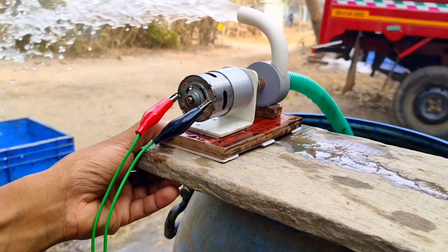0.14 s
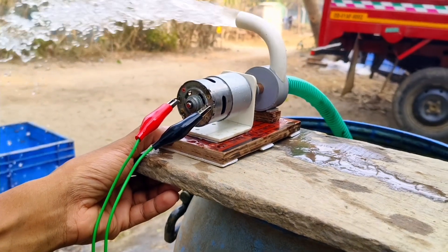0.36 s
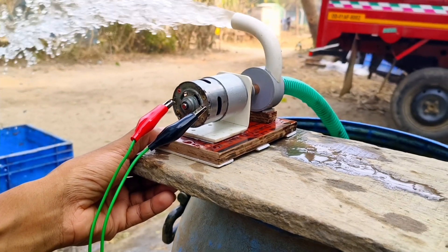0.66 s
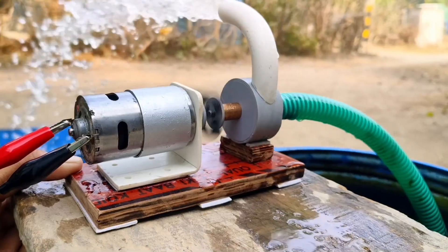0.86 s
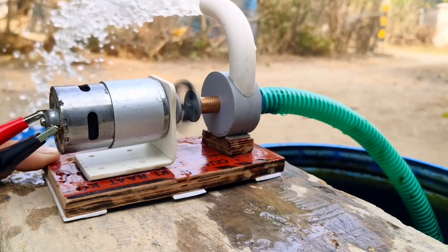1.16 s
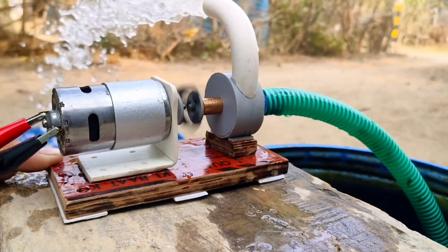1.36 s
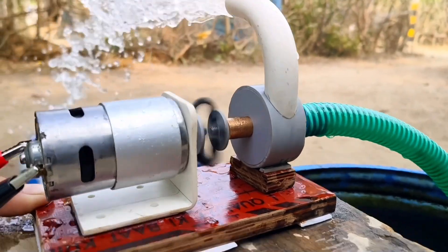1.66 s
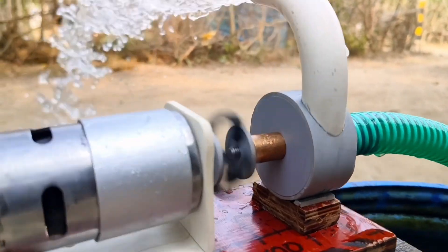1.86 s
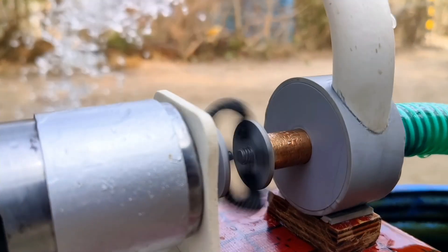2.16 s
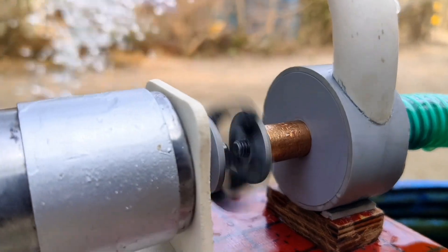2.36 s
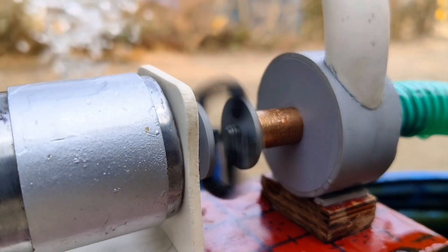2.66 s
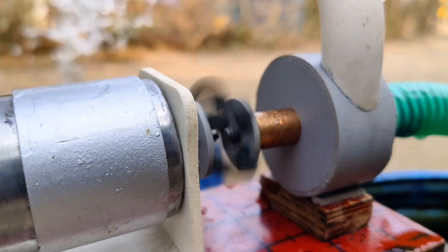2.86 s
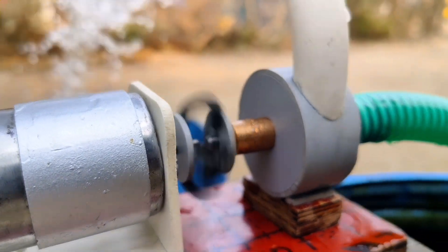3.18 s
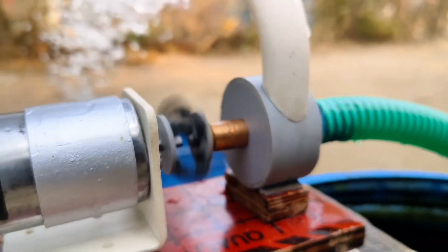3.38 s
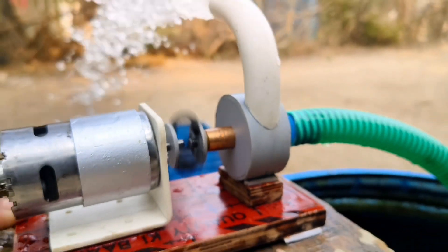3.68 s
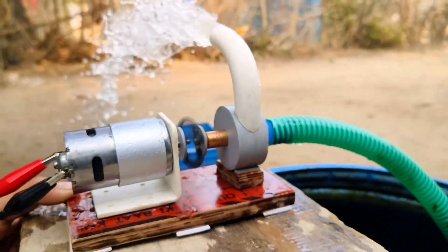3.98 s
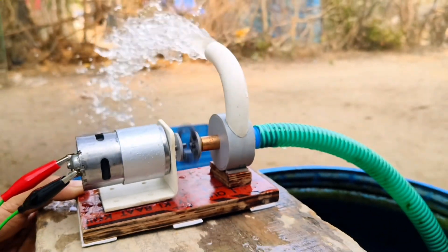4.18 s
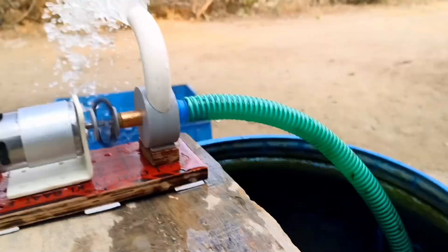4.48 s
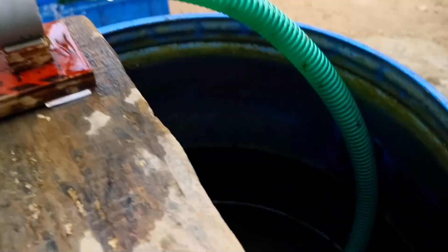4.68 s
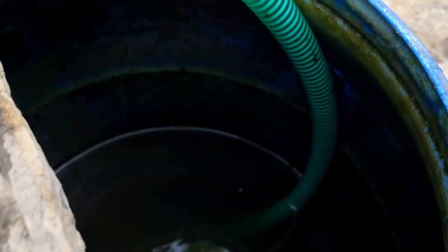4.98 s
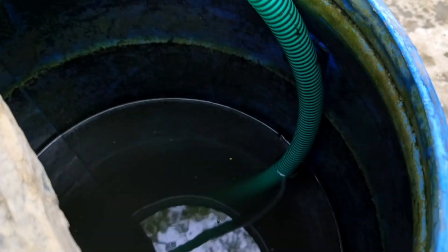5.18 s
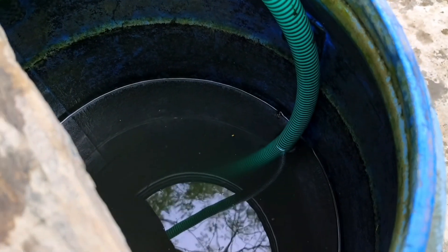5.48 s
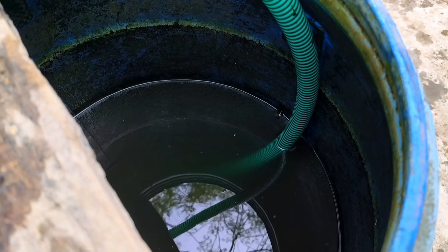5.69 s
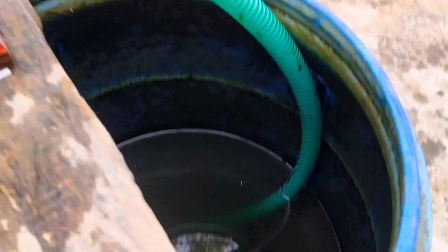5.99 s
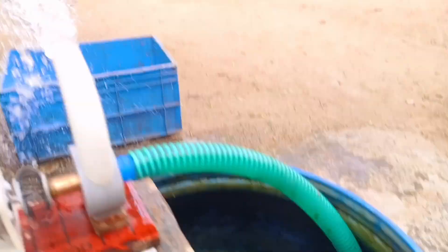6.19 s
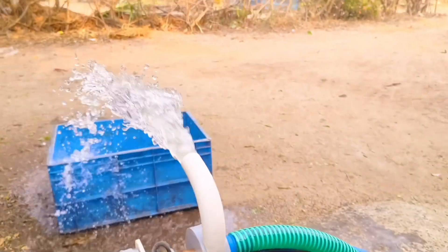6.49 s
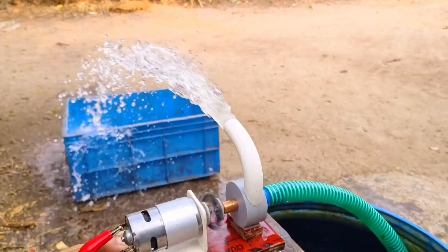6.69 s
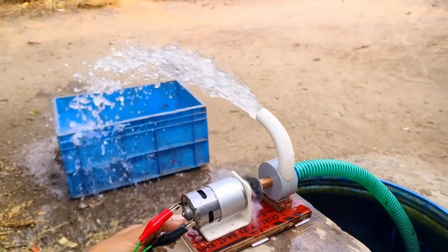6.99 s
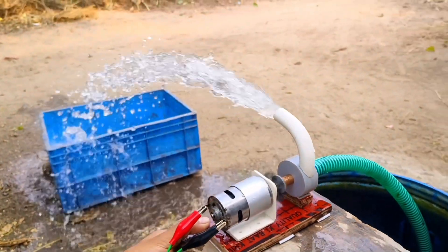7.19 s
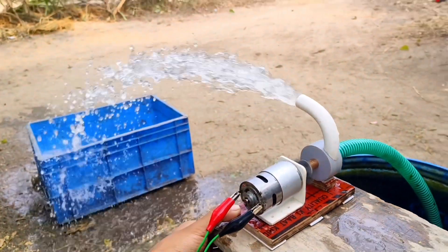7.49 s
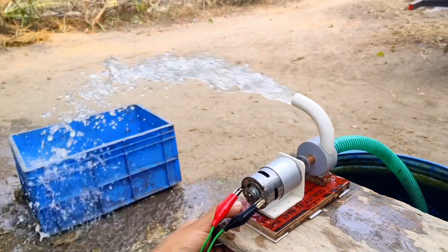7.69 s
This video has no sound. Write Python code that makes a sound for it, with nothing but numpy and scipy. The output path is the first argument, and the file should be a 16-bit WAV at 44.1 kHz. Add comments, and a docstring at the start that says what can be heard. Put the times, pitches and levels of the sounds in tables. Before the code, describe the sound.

Steady low motor drone with gushing, clumpy water splatter and sharp close drips, cutting to silence briefly before one second

```python
"""Pump on a barrel

A small electric pump on a slab over a plastic barrel throws a jet of water onto a crate and wet ground.
The shaft hums as sines at whole orders, noise rings the barrel and board, and short rings make the drops.
A pair of ports moves around the motor, so level and left-right balance drift.
The sound fades to near silence before one second and soon returns."""
import sys
import numpy as np
from scipy import signal
from scipy.io import wavfile
from scipy.ndimage import uniform_filter1d

SR = 44100
rng = np.random.default_rng(int(sys.argv[2]) if len(sys.argv) > 2 else 0)


def dump_mix(stems):
    """Bounce the given channels to the path in sys.argv[1] as a 16-bit WAV at rate SR."""
    frames = np.atleast_2d(stems).T  # one column per channel
    limited = np.clip(frames, -1, 1)  # hard clip at full scale
    pcm = np.round(limited * 32767).astype(np.int16)
    wavfile.write(sys.argv[1], SR, pcm)


N = 346185


def amp(db):
    """Decibels to gain."""
    return 10 ** (np.asarray(db) / 20)


def evened(x):
    """Scales to an rms of one."""
    return x / np.sqrt(np.mean(x ** 2) + 1e-20)


def read(points, hz):
    """Reads a table on a log-frequency axis."""
    f, value = np.transpose(points)
    return np.interp(np.log(hz + 1), np.log(f + 1), value)


def columns(rows):
    """Draws each column after the time as a curve, sample by sample."""
    s, *rest = np.transpose(rows)
    return [np.interp(np.arange(N) / SR, s, c) for c in rest]


def sides(db):
    """Left and right gains for a left-right difference at constant power."""
    pair = amp(np.array([db, -db]) / 2)
    return pair / np.sqrt(np.mean(pair ** 2, axis=0))


def wander(hz):
    """Slow random drift of rms one: noise low-passed at hz."""
    lowpass = signal.butter(2, hz, fs=SR, output="sos")
    return evened(signal.sosfilt(lowpass, rng.standard_normal(N)))


def bandpass(lo_hz, hi_hz):
    """Second-order band-pass filter sections."""
    return signal.butter(2, [lo_hz, hi_hz], "band", fs=SR, output="sos")


# Head start of the left port, before stretching. Each row: frequency in Hz, lead in radians.
PORT_LEAD = [(0, 0), (350, 0), (860, 1.6), (1040, 2.3), (1380, 3.05), (1700, 3.4), (2000, 4.4), (2200, 6),
             (2900, 9.4), (4200, 10.2), (5500, 12.6), (7000, 15.7), (8900, 22), (16200, 35)]
# Likeness of the two ports. Each row: frequency in Hz, share heard alike (0 to 1).
PORT_LIKENESS = [(60, .9), (140, .97), (300, .8), (600, .3), (1250, .84), (1550, .9), (1750, .62),
                 (2100, .15), (2900, .5), (6500, .4), (8000, .2), (15000, .12)]
# Colour of the right port. Each row: frequency in Hz, gain in dB.
RIGHT_COLOUR = [(300, -2.5), (800, 0), (1200, -1.5), (1550, -1), (2500, 3), (4000, -4.5), (5000, 1.5),
                (6500, 0.5), (9000, -1), (15000, 0)]
# Motor and barrel rim shade the water as the ports move; the stretches also serve the unshaded sources.
# Each row: time in seconds, gain of the low splash in dB, gain of the top in dB, left-right difference
# in dB, stretch of the path difference (a factor) in the low and in the high splash.
PORT_SHADE = [(0, 2, -4.5, -0.5, 1.26, 0.77), (.6, 6.1, -0.5, -0.54, 1.52, 1.09),
              (1.4, 7.5, -2.5, 1, 0.71, 1.07), (2.3, 4.3, -4, 0.66, 0.79, 1.02),
              (3.2, 2.2, -3, 0.34, 0.79, 1.005), (4.5, 9.1, -1, -0.42, 0.89, 1),
              (5, 3.5, -4, 0.66, 1.03, 1.32), (6, 3.6, -6, 0.51, 1.06, 1.31),
              (6.5, 10.7, -0.5, -0.42, 1.06, 0.97), (7.2, 3.7, -3.5, -0.29, 0.67, 1.05),
              (7.85, 1.7, -6, -0.42, 0.71, 1.07)]


def ports(direct, scattered, colour, shaded=False, patchy_db=0):
    """Colours a source; the right port hears it late and mixed with its scattered share."""
    hz, s, (left, other) = signal.stft([direct, scattered], SR, nperseg=1024)
    at, *curves = np.transpose(PORT_SHADE)
    low_db, top_db, pan, low_stretch, high_stretch = (np.interp(s, at, c) for c in curves)
    low = 1 / (1 + (hz / 1800) ** 6)
    top = 1 / (1 + (6000 / (hz + 1)) ** 6)
    same = np.clip(read(PORT_LIKENESS, hz), 0, 1)[:, None]
    lead = np.interp(hz, *np.transpose(PORT_LEAD))[:, None]
    stretch = np.outer(low, low_stretch) + np.outer(1 - low, high_stretch)
    late = np.exp(-1j * lead * stretch)
    right = same * late * left + np.sqrt(1 - same ** 2) * other
    right = right * amp(read(RIGHT_COLOUR, hz))[:, None]
    # the landing place wanders, so patches of pitch swell and sink
    patches = uniform_filter1d(rng.standard_normal(left.shape), size=16, axis=0)
    patches = evened(uniform_filter1d(patches, size=4, axis=1))
    shade_db = shaded * (np.outer(low, low_db) + np.outer(top, top_db))
    gain = amp(read(colour, hz)[:, None] + shade_db + patchy_db * patches)
    pair = np.array([left, right]) * gain * sides(shaded * pan)[:, None]
    return evened(signal.istft(pair, nperseg=1024)[1][:, :N])


STILL_AIR_DB = -60
# Swells of air on the ports. Each row: centre in seconds, level in dB, half length in seconds.
AIR_GUSTS = [(3.95, -54, .05), (4.414, -48, 0.1), (4.982, -39, 0.049), (5.55, -52, 0.11), (6.3, -51, .08),
             (7, -64, 0.092)]


def moving_air():
    """Air moving over the ports: deep band-passed noise in bell-shaped gusts."""
    now = np.arange(N) / SR
    swells = sum(amp(db) * np.exp(-((now - s) / half) ** 2) for s, db, half in AIR_GUSTS)
    air = signal.sosfilt(bandpass(40, 64), rng.standard_normal((2, N)))
    air = air + 1.2 * air[::-1]  # each port also hears the other's air
    return (amp(STILL_AIR_DB) + swells) * sides(7.)[:, None] * evened(air)


# Faint thin tones. Each row: start in seconds, length in seconds, first pitch in Hz, last pitch in Hz,
# level in dB.
THIN_TONES = [(6.72, .09, 1710, 1690, -46), (6.86, .08, 1690, 1690, -47.5), (7.29, .11, 1570, 1520, -44.5)]


def whistles():
    """A few faint sine tones, steady or slightly falling, softly in and out."""
    out = np.zeros(N)
    for s, length, from_hz, to_hz, db in THIN_TONES:
        u = np.arange(0, 1, 1 / (length * SR))
        phase = 2 * np.pi * np.cumsum(from_hz + (to_hz - from_hz) * u) / SR
        out[round(s * SR):][:len(u)] += amp(db) * 2 * np.sin(np.pi * u) * np.sin(phase)
    return out


# the slab follows a share of the 4th shaft order's swing about its middle level
RUMBLE_DB, RUMBLE_SHARE, MID_4TH_DB = -37, 0.49, -30


def slab_db():
    """Level of the slab rumble, from the nearness of the motor."""
    return RUMBLE_DB + RUMBLE_SHARE * (columns(SHAFT_ORDERS)[0] - MID_4TH_DB)


# Two noisy rings, the lower one from the mounting board and an upper one near 940 Hz. Each row: pitch in Hz,
# width in Hz, level in dB before the motor's nearness.
NOISY_RINGS = [(411, 48, -49), (943, 59, -47.5)]


def noisy_rings():
    """Resonances shaken by noise, the board's and one near 940 Hz, ringing in short uneven swells."""
    out, t = np.zeros((2, N)), np.arange(SR // 10) / SR
    for hz, width, db in NOISY_RINGS:
        shake = rng.standard_normal((2, N)) * amp(3 * wander(8))
        ring = t * np.exp(-np.pi * width * t) * np.sin(2 * np.pi * hz * t)
        out += amp(db) * evened(signal.oaconvolve(shake, ring[None], axes=1)[:, :N])
    return out * amp(slab_db() - RUMBLE_DB)


# Colour of the slab rumble. Each row: frequency in Hz, relative density in dB per Hz.
RUMBLE_COLOUR = [(40, -36.5), (65, -1), (100, -13.5), (200, 4), (420, -9.5), (700, -8.5), (900, -11.5),
                 (1300, -24), (3000, -63)]


def slab_rumble(knock):
    """The slab rumbles: coloured noise, pulsed once and twice a turn by the shaft load."""
    return amp(slab_db()) * ports(*rng.standard_normal((2, N)) * knock, RUMBLE_COLOUR)


# Drum modes of the barrel wall. Each row: pitch in Hz, nominal width in Hz (damped 1.5 times as fast),
# relative level in dB.
BARREL_MODES = [(148, 4.5, 11), (155, 5, 3)]
# Level of the boom noise over time. Each row: time in seconds, level in dB.
BOOM_LEVEL = [(0, -48.5), (.62, -51), (1.2, -35), (2.02, -37), (2.08, -29), (2.73, -27.5), (2.81, -39),
              (3.1, -25), (3.17, -48), (3.32, -18), (3.4, -35), (3.87, -27), (4.44, -40), (4.53, -29),
              (4.65, -39), (4.75, -25), (4.91, -19), (5.01, -30), (5.06, -28), (5.19, -29), (5.25, -25.5),
              (5.48, -32), (5.56, -38), (5.65, -29), (5.72, -37), (5.95, -22.5), (6.11, -26), (6.22, -43),
              (6.31, -31), (6.37, -42), (6.43, -29), (6.75, -43), (6.82, -28), (6.88, -35), (7.7, -37),
              (7.85, -40)]
BASS_LEAN_SHARE = 0.17  # the 2nd order and the boom take this share of the 4th order's lean to the left


def barrel_boom():
    """Turbulence in the hose, plain noise, shakes the barrel wall; both ports hear its modes alike."""
    shake, t = rng.standard_normal(N), np.arange(SR // 3) / SR
    wall = sum(amp(db) * width * t * np.exp(-np.pi * 1.5 * width * t) * np.sin(2 * np.pi * hz * t)
               for hz, width, db in BARREL_MODES)
    boom = evened(signal.oaconvolve(shake, wall)[:N])
    # the boom flutters less than pure chance would
    loudness = np.sqrt(abs(uniform_filter1d(boom ** 2, 2000)))
    boom = evened(boom / (0.15 + loudness) ** 0.53)
    lean_db = BASS_LEAN_SHARE * np.maximum(columns(SHAFT_ORDERS)[1], 0)
    return amp(columns(BOOM_LEVEL)[0]) * sides(lean_db) * boom


SHAFT_HZ = 66.62
# Strong shaft orders as the ports move around the motor. Each row: time in seconds, 4th order in dB, its
# left-right difference in dB, 8th order in dB, its lead on the left in radians, then the 5th, 6th and
# 2nd orders in dB.
SHAFT_ORDERS = [(0, -35.5, 6, -57, -2, -51.5, -42.5, -47.5), (.62, -36, 7.5, -52.5, 1, -47.5, -44.5, -45),
                (1, -26.5, -7, -40.5, 4.5, -52, -39.5, -37.5), (1.55, -23.5, -5, -40, 4, -57, -41, -33.5),
                (1.97, -20, -13, -34.5, 4, -36.5, -41, -30), (2.75, -18.5, -21, -38, 1, -35.5, -36, -30),
                (3.48, -19.5, -16.5, -36, 4, -40, -52, -29), (3.84, -22.5, -11, -41, 3, -56, -55, -32.5),
                (4.49, -28.5, 0, -39.5, 4.5, -53, -53, -32.5),
                (4.81, -23.5, 10.5, -34, 1.4, -54, -53, -30.5),
                (5.48, -25, 23, -35.5, 1.2, -58, -45, -26.5), (5.95, -24.5, 20, -37, 0.2, -56, -45, -29.5),
                (6.42, -28.5, 1, -40.5, 5, -54, -42, -31), (7.1, -32.5, 2, -43, 1.5, -68, -54, -33),
                (7.85, -33, 3, -41, 1.85, -52, -46, -36)]
# Weaker shaft orders. Each row: multiple of the shaft rate, level in dB above the 4th (while that is at
# NEAR_4TH_DB), own left-right difference in dB, lead on the left in radians.
WEAK_ORDERS = [(1, -30, 3, 1.4), (3, -19.5, -1, 2.5), (7, -24.5, 18.5, 3.5), (9, -30.5, 10, 0.67),
               (10, -25.5, 2.5, 1), (11, -27, 0, 1.1), (12, -26.5, -2.5, 1.25), (13, -30, 1.5, 1.1),
               (14, -24.5, 5, 2.3), (15, -28, 6, 1.54), (18, -28, 11.5, 2.7)]
WEAK_SWING, NEAR_4TH_DB = 0.4, -21.5  # the weaker orders fall off faster than the 4th away from the motor
LEAN_SHARE = .45  # the weaker orders take this share of the 4th order's left-right lean
LEAD_4TH = 0.2  # radians the 4th order leads on the left
MIRROR_8TH = -0.54  # while the motor is on the right, the 8th order leans the other way by this share


def motor():
    """Shaft orders as slightly wavering sines; also gives the load the shaft puts on the slab."""
    db4, pan4, db8, lead8, db5, db6, db2 = columns(SHAFT_ORDERS)
    turn = 2 * np.pi * np.cumsum(SHAFT_HZ + 0.094 * wander(2.9)) / SR
    ear = np.array([[.5], [-.5]])  # a lead is split between left and right
    pan8 = MIRROR_8TH * np.minimum(pan4, 0)
    pan2 = BASS_LEAN_SHARE * np.maximum(pan4, 0)
    hum = amp(db4 + 0.6 * wander(6)) * sides(pan4) * np.sin(4 * turn + ear * LEAD_4TH)
    hum += amp(db8 + 1.1 * wander(9.7)) * sides(pan8) * np.sin(8 * turn + ear * lead8)
    hum += amp(db5 + .7 * wander(8)) * sides(13.)[:, None] * np.sin(5 * turn)
    hum += amp(db6 + .7 * wander(8)) * sides(14.)[:, None] * np.sin(6 * turn + ear * 2.6)
    hum += amp(db2 + .8 * wander(8)) * sides(pan2) * np.sin(2 * turn + .7)
    for k, db, pan, lead in WEAK_ORDERS:
        level_db = db + db4 + WEAK_SWING * (db4 - NEAR_4TH_DB) + 2.5 * wander(4)
        waver = 2 * np.pi * rng.random() + .05 * k * wander(8)
        tone = np.sin(round(k) * turn + ear * lead + waver)
        hum += amp(level_db) * sides(pan + LEAN_SHARE * pan4) * tone
    # the unbalanced coupling loads the slab once and twice a turn
    knock = 1 + .3 * np.cos(turn) + 0.48 * np.cos(2 * turn)
    return np.sqrt(2) * hum, knock


# Drops that burst on the slab right by the ports. Each row: start in seconds, peak level in dB before
# panning, lowest Hz, highest Hz, crackle t60 in seconds, left-right difference in dB.
SLAB_BURSTS = [(.033, -16.5, 1800, 7000, 0.022, -2), (0.096, -16, 2000, 7500, 0.016, -2),
               (.201, -15.5, 3020, 7500, 0.027, 0), (0.214, -17, 5000, 7550, 0.025, -3),
               (.289, -20, 2500, 6030, .02, 2), (0.3565, -18.5, 2280, 7250, 0.034, 0),
               (0.608, -15, 3500, 9000, 0.018, 0), (0.624, -16, 2470, 6000, 0.024, 5),
               (1.101, -12.5, 2000, 8100, .025, 5), (4.694, -14, 1800, 5000, .025, 4),
               (4.785, -17, 800, 1800, 0.012, 6), (2.3556, -11, 4570, 7160, 0.027, -7),
               (3.314, -8, 2500, 15000, 0.0082, 5), (4.9205, -3, 7040, 17000, 0.006, 9),
               (4.3863, -13, 5000, 7400, .018, 0), (4.9226, -16, 8000, 13000, .006, 1),
               (6.1655, -11, 4500, 15000, 0.0066, 0), (6.175, -23, 6000, 15000, .006, 0),
               (6.312, -12, 4500, 15000, .004, 0), (7.2305, -13, 750, 2600, 0.014, 6),
               (7.234, -18, 900, 2900, .012, 2), (7.755, -13, 1900, 2980, .05, 4),
               (7.787, -18, 1900, 2800, 0.066, 1), (7.819, -18, 2220, 3800, .04, 0)]
TICK_DB = 5  # the first instant of a burst, above its crackle


def snaps():
    """Each bursting drop is a sharp tick and a quickly dying crackle of noise in its band."""
    out, t = np.zeros((2, N + 2000)), np.arange(2000) / SR
    for s, db, lo_hz, hi_hz, t60, pan in SLAB_BURSTS:
        band = bandpass(lo_hz, min(hi_hz, 20000))
        tick = signal.sosfilt(band, 1. * (t == 0))
        crackle = evened(signal.sosfilt(band, rng.standard_normal((2, len(t))))) * amp(-60 * t / t60)
        burst = amp(TICK_DB) * tick / abs(tick).max() + crackle
        out[:, round(s * SR):][:, :len(t)] += amp(db - TICK_DB) * sides(pan)[:, None] * burst
    return out[:, :N]


# Large drops. Each row: start in seconds, level in dB (its parts are scaled below it), ring in Hz,
# left-right difference in dB.
LARGE_DROPS = [(.032, -20, 2900, 1), (.096, -16, 6600, -6), (.097, -21, 2560, 0), (.201, -16, 3660, 13),
               (.288, -20, 3530, -3), (0.201, -20, 5700, -6), (.356, -23, 3530, 4), (.608, -18, 6900, -3),
               (.624, -14.5, 4630, -1), (1.068, -16, 2620, 7), (1.102, -19, 2130, 6), (1.197, -7, 1520, 2),
               (1.749, -16, 2720, -2), (2.254, -13, 2530, 20), (2.356, 3, 6440, 3), (2.3562, -13, 5150, 1),
               (2.362, -8, 6340, 0), (2.53, -14.5, 2470, 0), (3.865, -13.5, 5160, 2),
               (3.932, -7.5, 6360, 3), (4.385, -12, 2035, 8), (4.394, -8, 2006, -5),
               (4.599, -12.5, 7070, 11), (4.694, -14, 2150, 2), (4.7866, -12, 1270, 19),
               (4.785, -19, 1660, 0), (4.991, -14, 2520, 4.5), (5.063, -12, 2170, 3),
               (5.065, -12.5, 6200, 4), (5.175, -11, 3500, 6), (5.535, -16, 2770, 9),
               (5.626, -14.5, 2630, -3), (5.7, -15, 2030, 0), (5.258, -10, 2800, 10),
               (5.397, -10, 5860, .5), (5.909, -13.5, 2500, 7), (6.1655, -8, 7200, -2),
               (6.312, -16, 5270, -.5), (6.468, -20, 950, 0), (7.641, -17, 2140, 2), (7.656, -21, 980, 0),
               (7.667, -17, 930, -3), (7.501, -17, 1000, -4), (7.521, -24, 2600, 0), (7.49, -23, 2270, 4),
               (7.305, -21, 1300, 3), (6.711, -8.5, 2510, 8), (6.812, -8.5, 2760, 6), (7.026, -14, 5520, 0),
               (7.23, -2.5, 1010, -5), (7.2335, -5, 1310, 1), (7.185, -18, 2070, -4),
               (7.665, -12.5, 2520, -1), (7.61, -24, 2280, -4), (6.94, -13.5, 2580, 0),
               (5.158, -17, 2150, 14), (7.2617, -9, 5150, -1.5), (7.313, -9, 4960, -3),
               (7.417, -10.5, 4600, -1), (7.756, -9.5, 2420, 13), (7.763, -8.5, 1270, 4),
               (7.236, -14, 2010, -1), (7.789, -17, 2100, 7)]
RING_T60_S, RING_SLOPE = 0.043, -0.8  # ring time at 2 kHz, and its power law in pitch
KNOCK_HZ, KNOCK_T60_S = 1400, .015  # drops up to this pitch knock on the slab, reaching both ports together
FUZZ_DB, SLAP_DB = -10.5, -24  # gains of the fuzz and the slap noise


def splats():
    """Each large drop: a ring at its own pitch, fuzz around it and a short bright slap."""
    out, t = np.zeros((2, N + 4000)), np.arange(3000) / SR
    bright = signal.butter(2, 4000, "high", fs=SR, output="sos")
    attack = 1 - np.exp(-t / .00025)
    for s, db, hz, pan in LARGE_DROPS:
        noise = rng.standard_normal((2, len(t)))
        t60 = RING_T60_S * (hz / 2000) ** RING_SLOPE if hz > KNOCK_HZ else KNOCK_T60_S
        lag = np.interp(hz, *np.transpose(PORT_LEAD)) * (hz > KNOCK_HZ)
        ring = np.sin(2 * np.pi * hz * t - np.array([[0], [lag]]))
        # the wet surface answers in a band around the ring, differently at each port
        fuzz = evened(signal.sosfilt(bandpass(hz * 0.72, hz * 1.15), noise))
        drop = amp(-60 * t / t60) * (0.62 * ring + amp(FUZZ_DB) * fuzz)
        drop += amp(SLAP_DB - 60 * t / 0.01) * signal.sosfilt(bright, noise)
        out[:, round(s * SR):][:, :len(t)] += amp(db) * sides(pan)[:, None] * attack * drop
    return out[:, :N]


def patter(per_s, spread_db, lo_hz, hi_hz, cycles, t60, wet_db, count=40):
    """Many small drops, short rings of varied pitch and place; gives the near and the scattered sound."""
    size = amp(spread_db * np.minimum(rng.exponential(1, N), 4.5)) * (rng.random(N) < per_s / SR)
    kind, out, t = rng.integers(0, count, N), np.zeros((2, N)), np.arange(2000) / SR
    for k, hz in enumerate(rng.permutation(np.geomspace(lo_hz, hi_hz, count))):
        u = t * hz  # time in cycles
        ring = (1 - np.exp(-u / 0.43)) * np.exp(-u / cycles)
        ring = ring * np.sin(2 * np.pi * u * (1 + 0.00568 * u))  # the pitch rises slightly
        # each landing place has its own reflections off ground, crate and slab
        tails = rng.standard_normal((2, len(t))) * amp(-60 * t / t60)
        tails = tails / np.linalg.norm(tails, axis=1)[:, None]
        heard = signal.fftconvolve(ring[None], tails, axes=1)[:, :len(t)]
        heard[0] = ring + amp(wet_db) * heard[0]
        heard *= np.sqrt(hz) / np.linalg.norm(heard, axis=1)[:, None]
        out += signal.oaconvolve((size * (kind == k))[None], heard, axes=1)[:, :N]
    return evened(out)


# Level changes of the splash. Each row: time in seconds, step up or down in dB that dies away afterwards,
# rise or dip in dB leading up to that time.
SPLASH_STEPS = [(0.094, 3.5, 1.5), (.155, 7, 0.5), (0.199, -1, -5.5), (.355, 4, 1), (.607, 4, 2.5),
                (.436, 3, -2), (1.028, 2.5, -7), (1.101, -1.5, -1), (1.252, 5, 0), (1.305, 4.5, 0.5),
                (1.402, 4.5, -0.5), (1.516, 6.5, 1), (1.575, 4, 0.5), (1.798, 5.5, 2), (1.958, 2, 1),
                (2.045, 4, 2.5), (2.11, 5.5, 0.5), (2.159, 4, 0.5), (2.284, 3, 3), (2.528, 2.5, -2.5),
                (2.68, 7, 0), (2.734, 3, -1), (3.199, 7, 0.5), (3.722, 5, 2), (3.81, 5, -2.5),
                (4.154, 7, -0.5), (4.306, 5.5, 0.5), (4.491, 1, -1.5), (4.599, 7, 3), (4.664, 3.5, -2.5),
                (5.105, 2.5, -0.5), (5.524, 3, -1), (5.907, 6.5, 0.5), (6.032, 6.5, 0.5),
                (6.135, 4.5, -0.5), (6.312, 4.5, 2.5), (6.651, 6, -1), (6.812, 1.5, -1), (6.864, 4.5, -0.5),
                (6.963, 7.5, 2), (7.492, 5, -1), (1.166, 3, -4), (1.748, 5.5, -1), (1.914, 5, 0.5),
                (2.344, 5, 1), (2.97, 4, -2), (3.115, 3, -3), (3.235, 1.5, -2), (3.309, 6, -5),
                (3.46, 0.5, -1), (4.384, 9.5, -2), (4.693, 1, -4), (4.784, 1.5, -2), (4.91, -4.5, -6),
                (4.98, 5, 1.5), (5.062, 2, -4.5), (5.401, 5.5, 0.5), (5.68, 2.5, 4), (5.855, 7, 1),
                (6.165, -6, 2.5), (6.214, 7.5, 5), (6.43, 2.5, -3.5), (6.539, 5, -1), (6.713, 2.5, -4.5),
                (7.025, 4, -6.5), (7.19, 4, 2.5), (7.395, 4, -1), (7.44, 2, -1.5), (7.516, 1.5, -0.5),
                (7.596, 4, -1.5), (7.753, 6.5, -3)]
LEAD_UP_S, DIE_AWAY_S = 0.061, 0.028  # time constants before and after each step


def bunching_db():
    """The broken jet's uneven level: a rise or dip leads up to each step, which then dies away."""
    s, *db = np.transpose(SPLASH_STEPS)
    step, lead_up = np.zeros((2, N))
    step[(s * SR).astype(int)], lead_up[(s * SR).astype(int) - 1] = db

    def fading(x, tau):
        return signal.lfilter([1], [1, -np.exp(-1 / (tau * SR))], x)
    return fading(step, DIE_AWAY_S) + fading(lead_up[::-1], LEAD_UP_S)[::-1]


# Strength of the jet's landing, before bunching. Each row: time in seconds, splash in dB, fine spray in dB.
JET_FLOW = [(0, -29, -36.5), (.55, -35, -40), (1, -25, -35), (1.5, -28.5, -37.5), (2.6, -27, -36.5),
            (3.5, -26, -37), (4.25, -28.5, -39), (4.8, -26.5, -35.5), (5.5, -28.5, -39.5), (6.1, -30, -39),
            (6.4, -27, -33.5), (7.1, -26, -34.5), (7.5, -24, -33.5), (7.85, -24.5, -34.5)]
# Colour of the splash. Each row: frequency in Hz, relative density in dB per Hz.
SPLASH_COLOUR = [(300, -27.5), (750, -15.5), (1100, -6.5), (1600, -4), (2400, -3.5), (3600, 1),
                 (5200, -0.5), (7200, 2.5), (8300, -7.5), (11000, -15), (16000, -39.5)]
# Colour of the fine spray. Each row: frequency in Hz, relative density in dB per Hz.
SPRAY_COLOUR = [(5000, -38), (8000, -10), (9000, -4), (12000, -1), (15400, -0.5), (17000, -8)]
SPRAY_SHARE = 0.91  # the spray follows this share of the bunching in dB


def splash():
    """The broken jet lands in clumps: hiss, patter, taps on the crate and fine spray swell together."""
    level_db, spray_db = columns(JET_FLOW)
    bunch_db = bunching_db()
    # small clumps, about 55 a second, each land at once and drain away in 11 ms
    landing = rng.random(N) * (rng.random(N) < 55 / SR)
    clumps = evened(1 + .95 * signal.lfilter([1], [1, -np.exp(-1 / (.011 * SR))], landing))
    drops = patter(2000, 2.34, 736, 8760, cycles=1.29, t60=0.098, wet_db=0.0, count=14)
    taps = amp(-12.0) * patter(140, 4.2, 881.0, 7360, cycles=8.3, t60=0.011, wet_db=-4.0, count=14)
    crate = amp(-12.0) * patter(60, 3.0, 1951, 2810, cycles=8.8, t60=0.12, wet_db=9.5, count=6)
    hiss = amp(1.0) * rng.standard_normal((2, N))
    water = ports(*(drops + taps + crate + hiss), SPLASH_COLOUR, shaded=True, patchy_db=1.0)
    mist = patter(1300, 3.2, 6850, 16800, cycles=2.3, t60=0.024, wet_db=-0.5, count=7)
    fine_hiss = amp(6.0) * rng.standard_normal((2, N))
    spray = ports(*(mist + fine_hiss), SPRAY_COLOUR, patchy_db=2.55)
    landed = clumps * amp(level_db + bunch_db) * water
    return landed + np.sqrt(clumps) * amp(spray_db + SPRAY_SHARE * bunch_db) * spray


def scene():
    """Air, board, slab, barrel, motor and water together."""
    hum, knock = motor()
    background = moving_air() + whistles() + noisy_rings() + slab_rumble(knock) + barrel_boom()
    return background + hum + snaps() + splats() + splash()


# Overall level, with one fade to near silence and back. Each row: time in seconds, gain in dB.
OVERALL_FADE = [(.635, 3), (.66, -2), (.737, -9), (.749, -27), (.765, -68), (.936, -97.5), (.942, -18),
                (.96, -3), (1, -1.5)]
EDGE_HZ = 15650  # upper band limit


def record(dry):
    """Fades the sound out and back in once, then limits the band with a steep low-pass."""
    faded = dry * amp(columns(OVERALL_FADE)[0])
    lowpass = signal.firwin(511, EDGE_HZ, window=("kaiser", 9), fs=SR)
    return signal.oaconvolve(faded, lowpass[None], "same")


dry = scene()
out = record(dry)
dump_mix(out)
```